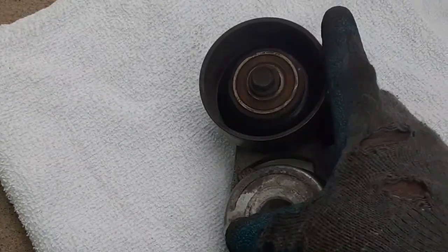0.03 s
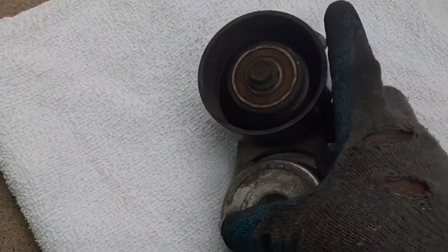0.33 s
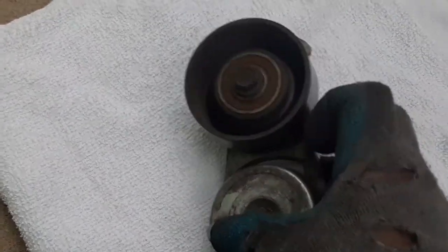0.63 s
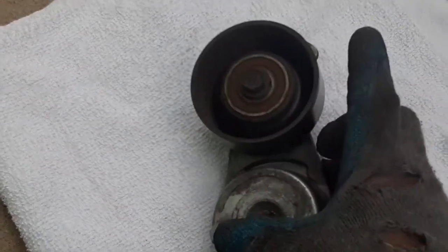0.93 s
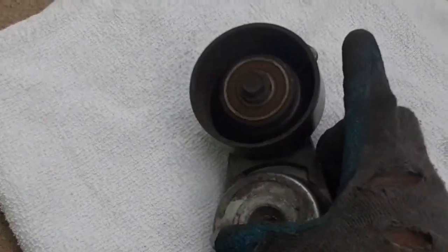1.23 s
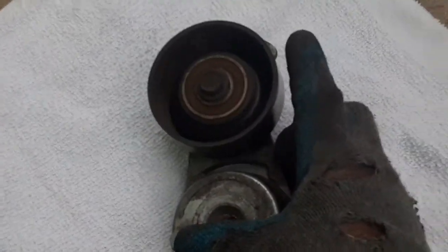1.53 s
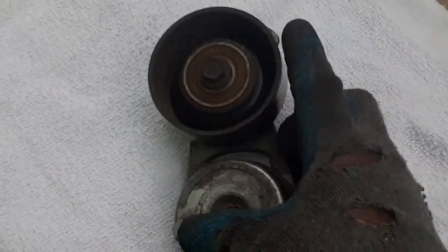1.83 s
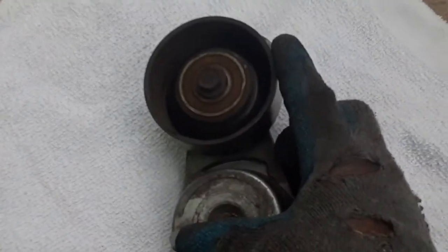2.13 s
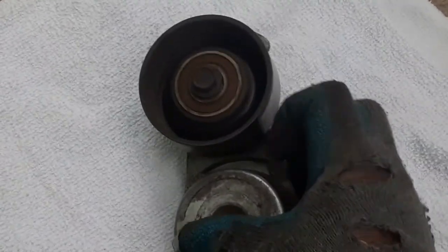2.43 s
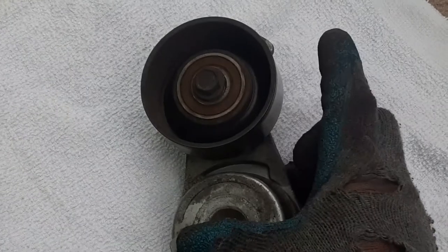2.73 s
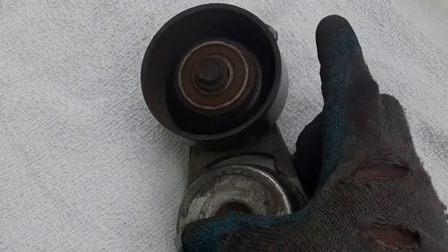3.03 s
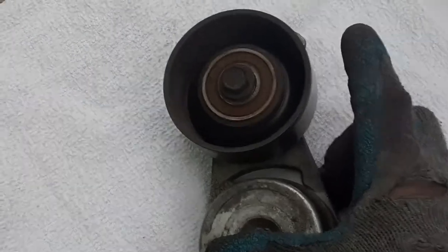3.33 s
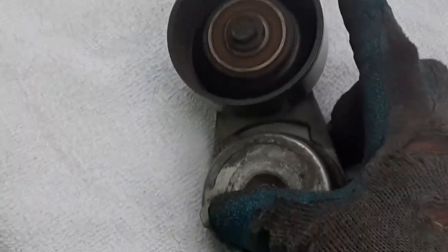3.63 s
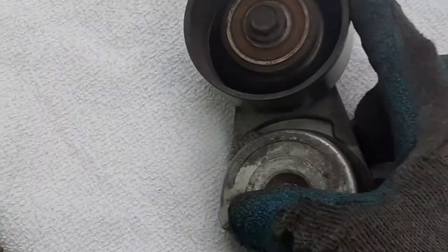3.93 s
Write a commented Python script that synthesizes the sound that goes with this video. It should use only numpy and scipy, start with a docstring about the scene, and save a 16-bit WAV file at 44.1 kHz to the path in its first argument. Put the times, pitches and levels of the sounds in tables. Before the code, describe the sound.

A steel pulley whirs quietly, close up indoors. A gloved finger clacks and scrapes against the rim, the bearing spins and fades, then a second flick sets it rattling lightly until the glove stops it, over a low rumble.

```python
"""Indoors, close up: a gloved finger flicks the steel pulley of a belt tensioner twice.
Stick-slip friction of the glove scrapes the rim, which rings in its free modes on release.
Impacts of the bearing balls force the wheel's resonances: a whir that fades as the wheel slows.
The held part clacks and bumps in the hand, over a low rumble and a faint far motor drone."""
import sys
import numpy as np
from scipy import signal
from scipy.fft import rfft, irfft
from scipy.io import wavfile
from scipy.ndimage import uniform_filter1d

SR = 44100
rng = np.random.default_rng(int(sys.argv[2]) if len(sys.argv) > 2 else 0)


def dump(signal):
    """Clip the signal to [-1, 1] and save it as 16-bit WAV at the path in sys.argv[1]."""
    limited = np.clip(np.atleast_2d(signal).T, -1, 1)
    pcm = np.round(limited * 32767).astype(np.int16)
    wavfile.write(sys.argv[1], SR, pcm)


N = 176400
T = np.arange(N) / SR
HZ = np.fft.rfftfreq(4096, 1 / SR)


def amp(db):
    """Amplitude ratio of a level in decibels."""
    return 10 ** (np.asarray(db) / 20)


def unit(x):
    """Normalisation to rms 1."""
    return x / np.sqrt(np.mean(x ** 2) + 1e-20)


def unit_power(shape_db):
    """Normalisation of a spectrum to a mean power gain of 1."""
    return shape_db - 10 * np.log10(np.mean(amp(shape_db) ** 2))


def read(points, hz):
    """Interpolation on a logarithmic frequency axis."""
    f, value = np.transpose(points)
    return np.interp(np.log(hz + 1), np.log(f + 1), value)


def resonance_db(hz, width):
    """Resonance curve over HZ, 0 dB at its peak."""
    return -13 * np.log10(1 + (2 * (HZ - hz) / width) ** 2)


def colour(x, gain_db):
    """Minimum-phase filtering with a gain given over HZ."""
    cepstrum = irfft(np.log(amp(gain_db)), axis=-1)
    half = len(HZ) - 1
    cepstrum[..., 1:half] *= 2
    cepstrum[..., half + 1:] = 0
    response = irfft(np.exp(rfft(cepstrum, axis=-1)), axis=-1)
    return signal.oaconvolve(x, np.atleast_2d(response), axes=1)[:, :N]


def drift(rate_hz):
    """Random modulation: low-pass noise of rms 1."""
    f = np.fft.rfftfreq(N, 1 / SR)
    return unit(irfft(rfft(rng.standard_normal(N)) * np.exp(-(f / rate_hz) ** 2), N))


def swell(peak, rise, fall):
    """Asymmetric bell envelope; times in seconds."""
    return np.exp(-.5 * abs((T - peak) / np.where(T < peak, rise, fall)) ** 1.67)


def shifted(x, shift_hz):
    """Single-sideband modulation: all frequencies move by the same varying amount."""
    return (signal.hilbert(x) * np.exp(2j * np.pi * np.cumsum(shift_hz) / SR)).real


def impacts(grain_db, per_s, coherence=0.32):
    """Shot noise: tiny impacts of uneven size, partly coherent between the channels."""
    size = amp(grain_db * np.minimum(rng.exponential(1, N), 5))
    struck = rng.random(N) < per_s / SR
    left, other = np.sign(rng.standard_normal((2, N)))
    shared = rng.random(N) < coherence
    return unit(size * struck * np.array([left, np.where(shared, left, other)]))


# Left-right coherence of the room's noise: frequency_hz, coherence_ratio
FIELD_COHERENCE = [(60, 1), (150, .98), (300, 0.81), (550, 0.74), (1000, 0.027), (12000, 0.036)]

def diffuse_noise(spectrum, top_hz):
    """A diffuse field is coherent between two points only at long wavelengths."""
    f = np.fft.rfftfreq(N, 1 / SR)
    left, other = rfft(rng.standard_normal((2, N)), axis=1)
    coherence = np.clip(read(FIELD_COHERENCE, f), 0, 1)
    right = coherence * left + np.sqrt(1 - coherence ** 2) * other
    gain = amp(read(spectrum, f)) / np.hypot(1, (f / top_hz) ** 10)
    return unit(irfft(np.array([left, right]) * gain, N, axis=1))


# Spectrum of the rumble: frequency_hz, relative_db
RUMBLE_SPECTRUM = [(15, -55), (40, -29), (60, -17), (80, 0.5), (100, 1.5), (135, 0.5), (168, -1.5),
                   (200, -11), (230, -13), (260, -29.5)]
# Envelope of the rumble: time_s, relative_db
RUMBLE_ENVELOPE = [(0, -36.5), (.45, -35), (.58, -38), (.69, -32), (.8, -38), (1.15, -32.5), (1.25, -34.5),
                   (1.5, -34), (1.66, -31), (1.85, -34), (2.1, -34), (2.3, -36.5), (2.7, -38), (3.3, -40),
                   (4, -43.5)]
# Spectrum of the steadier, deeper band: frequency_hz, relative_db
DEEP_SPECTRUM = [(15, -55), (28, -37), (40, -21.5), (54, 1.5), (75, -6.5), (110, -15), (200, -30)]

def rumble():
    """Amplitude modulation: two low noise bands swell together, a little louder on the left than on the right."""
    level_db = np.interp(T, *np.transpose(RUMBLE_ENVELOPE))
    deep_db = -49 + 0.64 * (level_db - level_db.mean())
    deep = amp(deep_db) * diffuse_noise(DEEP_SPECTRUM, top_hz=201)
    upper = amp(level_db) * diffuse_noise(RUMBLE_SPECTRUM, top_hz=248)
    return (upper + deep) * amp([[.9], [-.9]])


# Tones of a far motor: peak_s, spread_s, pitch_hz, glide_hz_per_s, level_db
MOTOR_TONES = [(2.3, .17, 301, 25, -52), (2.9, .16, 326, 35, -47.5), (3.55, .45, 431, 5, -55),
               (2.6, 1.5, 397, 1, -60.5)]

def far_motor(waver_hz=1.0):
    """Frequency modulation: faint tones waver and glide upward as they swell and fade."""
    out = np.zeros(N)
    for peak, spread, hz, glide, db in MOTOR_TONES:
        pitch = hz + glide * (T - peak) + waver_hz * drift(rate_hz=5.8)
        envelope = amp(db) * np.exp(-.5 * ((T - peak) / spread) ** 2)
        out += envelope * np.sin(2 * np.pi * np.cumsum(pitch) / SR)
    return out


# Spectrum of room air and hiss: frequency_hz, relative_db
AIR_SPECTRUM = [(120, -7), (230, -2), (320, -1.5), (500, -11), (750, -15), (1100, -17), (1600, -24),
                (2600, -36.5), (4200, -38), (7000, -46), (9500, -51), (11500, -35.5), (15700, -33.5)]

def room_air():
    """Stationary broadband noise sets the noise floor."""
    return amp(-49) * diffuse_noise(AIR_SPECTRUM, top_hz=SR)


def reverberation(x, level_db=-17, t60_s=.2):
    """Diffuse reflections build up quickly and decay exponentially."""
    t = T[:SR // 2]
    tail = rng.standard_normal((2, len(t))) * amp(-60 * t / t60_s) * np.minimum(t / 0.0092, 1)
    return amp(level_db) * signal.oaconvolve(x, tail / np.linalg.norm(tail[0]), axes=1)[:, :N]


# Balance of the wheel, which sits to the left: frequency_hz, left_minus_right_db
WHEEL_BALANCE = [(600, -0.5), (1400, 13), (2500, 8.5), (4400, 7.5), (6500, 5.5), (8100, 0.5), (9800, -5),
                 (15000, -13)]

def placed(x):
    """A level difference between the channels, at constant total power, locates the wheel."""
    lean_db = read(WHEEL_BALANCE, HZ)
    excess_db = 10 * np.log10(np.cosh(lean_db * np.log(10) / 20))
    return colour(x, np.array([lean_db, -lean_db]) / 2 - excess_db)


# Dead knocks of handling: start_s, level_db, pitch_hz, rise_s, left_minus_right_db
KNOCKS = [(0.874, -44, 910, 0.00083, 7.5), (1.3606, -37, 530, 0.0018, 1), (2.3457, -31, 1880, 0.00062, 14)]
# Reflections from bench and hand: delay_s, gain_db
REFLECTIONS = [(.0018, -16), (.003, -16), (.0042, -19)]

def knocks(direct_delay_s=0.0006, sharpness=3.6):
    """Heavy damping ends each knock in a cycle or two; early reflections follow."""
    out = np.zeros((2, N))
    for start, db, hz, rise, lean_db in KNOCKS:
        sides_db = db + np.array([[lean_db], [-lean_db]]) / 2
        for delay, gain_db in [(direct_delay_s, 0)] + REFLECTIONS:
            t = np.maximum(T - start - delay, 0)
            envelope = (t / rise * np.exp(1 - t / rise)) ** sharpness
            out += amp(sides_db + gain_db) * envelope * np.sin(2 * np.pi * hz * t)
    return out


def ring(modes, start, rise_s, right_lag_rad=1.3):
    """Free vibration: a sum of damped modes, lagging in phase on the right."""
    t = T[:SR]
    lag = np.array([[0], [right_lag_rad]])
    wave = sum(amp(db - 60 * t / t60) * np.sin(2 * np.pi * hz * t - lag) for hz, db, t60 in modes)
    attack = 1 - np.exp(-t / rise_s)
    return np.pad(wave * attack, ((0, 0), (round(start * SR), N)))[:, :N]


# Modes of the held part: pitch_hz, relative_db, t60_s
BODY_MODES = [(1020, -14, 0.014), (1320, 2, 0.015), (1590, -9.5, 0.044), (2260, -9, 0.034),
              (2480, -18, 0.048), (2860, -23, 0.019), (4500, -31, 0.016), (6340, -20.5, 0.01)]
# Impacts as the finger takes hold: start_s, level_db
BODY_IMPACTS = [(0.433, -46), (.447, -37.5), (0.4729, -33), (0.4789, -39), (0.4805, -30), (0.484, -28)]

def clacks():
    """Impulse response: each impact excites the short-lived modes of the held part."""
    return sum(amp(db) * ring(BODY_MODES, start, rise_s=0.00032) for start, db in BODY_IMPACTS)


# Slow rubs on the rim: peak_s, rise_s, fall_s, level_db
SLOW_RUBS = [(0, .03, 0.059, -61), (.222, 0.063, 0.067, -54.5), (.39, 0.087, 0.046, -77),
             (1.66, 0.012, 0.057, -64.5), (1.80, 0.017, 0.027, -67), (1.888, 0.017, 0.026, -61),
             (3.81, 0.026, 0.04, -78)]
# Spectrum of slow rubbing: frequency_hz, relative_db
RUB_SPECTRUM = [(200, 1), (700, -3.5), (1400, 3), (1900, -2), (2200, 1.5), (3300, -4), (4300, -5.5),
                (4900, -8.5), (5500, -8), (7000, -12.5), (10000, -14.5), (15700, -13.5)]
# Quick strokes on the rim: peak_s, rise_s, fall_s, level_db, treble_tilt_db_per_octave
QUICK_STROKES = [(0.481, 0.011, 0.02, -48.5, -2), (.525, 0.029, 0.016, -51.5, -4.5),
                 (.585, 0.022, 0.04, -49, -2.5), (0.696, 0.02, 0.017, -43.5, 0.8),
                 (.77, 0.023, 0.072, -62, 0), (2.385, 0.029, 0.031, -57, -6.5),
                 (2.422, 0.013, 0.0081, -47.5, 0.5), (2.518, 0.011, 0.034, -58.5, 3),
                 (3.775, 0.022, 0.028, -55, 2.6), (3.83, .03, 0.069, -62.5, 0)]
# Spectrum of a quick stroke on steel: frequency_hz, relative_db
STROKE_SPECTRUM = [(200, -23), (600, -1.5), (1400, 1.5), (1900, 0.5), (2500, 3), (3500, 0.5), (4600, -1),
                   (5800, -3), (7200, -4), (9500, -4.5), (12000, -1), (15700, -2)]

def glove():
    """Stick-slip friction: fibres catch on the rim, dull in slow rubs, brighter in quick strokes."""
    fibres = impacts(grain_db=3.1, per_s=12000) * amp(0.59 * drift(rate_hz=39))
    rubbing = sum(amp(db) * swell(peak, rise, fall) for peak, rise, fall, db in SLOW_RUBS)
    out = colour(fibres * rubbing, unit_power(read(RUB_SPECTRUM, HZ)))
    treble_octaves = np.log2(np.maximum(HZ, 2000) / 2000)
    for peak, rise, fall, db, tilt in QUICK_STROKES:
        shape_db = read(STROKE_SPECTRUM, HZ) + tilt * treble_octaves
        out += colour(fibres * swell(peak, rise, fall), db + unit_power(shape_db))
    return out


# Scuffs and squeaks on the wheel: peak_s, spread_s, level_db, centre_hz, width_hz
SCUFF_BURSTS = [(.22, 0.017, -53, 2650, 450), (.225, 0.027, -62, 4060, 700),
                (0.455, 0.0055, -51.5, 2470, 300), (.53, 0.011, -57.5, 2700, 600),
                (.594, 0.0082, -51, 2350, 400), (.693, 0.009, -55, 1580, 500),
                (1.335, .004, -60, 13000, 3970), (1.376, 0.0087, -61, 6500, 1200),
                (2.685, 0.0027, -62, 13000, 3500), (2.70, .006, -66, 3920, 900),
                (3.05, .012, -68, 14300, 1500), (3.11, .006, -66, 14000, 2500),
                (3.582, .003, -63, 14500, 1500)]

def scuffs():
    """Frictional excitation: each short burst of slips drives one resonance."""
    slips = impacts(grain_db=2.5, per_s=17000)
    out = np.zeros((2, N))
    for peak, spread, db, hz, width in SCUFF_BURSTS:
        shape_db = -20 * np.log10(1 + 2 * ((HZ - hz) / width) ** 2)
        out += colour(slips * swell(peak, spread, spread), db + unit_power(shape_db))
    return out


# Judder of the braking glove: peak_s, rise_s, fall_s, level_db
JUDDER = (3.806, .038, .014, -57.5)
# Rim resonances under the judder: centre_hz, width_hz, relative_db
JUDDER_MODES = [(1620, 220, -2), (2060, 420, 0), (2560, 160, -5)]

def brake():
    """Coarse stick-slip excites the rim as the glove stops the wheel."""
    peak, rise, fall, db = JUDDER
    power = sum(amp(mode_db + resonance_db(hz, width)) ** 2 for hz, width, mode_db in JUDDER_MODES)
    slips = impacts(grain_db=3.0, per_s=900) * swell(peak, rise, fall)
    return colour(slips, db + unit_power(10 * np.log10(power)))


# Modes of the steel rim: pitch_hz, relative_db, t60_s
RIM_MODES = [(2520, -1, .4), (3044, -6, .6), (3488, -6, .4), (5816, -5, .3), (9493, -.5, .6),
             (11200, 2, .1), (14228, 2, .48)]
# The finger leaves the rim: start_s, level_db
RIM_RELEASES = [(0.695, -57.5), (2.425, -78)]

def rim(beat_hz=19, beat_db=3, rough_db=2.2, waver_hz=12):
    """Free vibration of the released rim, beating and roughened by the balls."""
    ringing = sum(amp(db) * ring(RIM_MODES, start, rise_s=0.008) for start, db in RIM_RELEASES)
    throb_db = beat_db * np.cos(2 * np.pi * beat_hz * T) + rough_db * drift(rate_hz=200)
    return shifted(ringing * unit(amp(throb_db)), waver_hz * drift(rate_hz=49))


# Free spins: start_s, stop_s, level_db, decay_db_per_s, initial_turns_per_s, run_out_s
FREE_SPINS = [(0.717, 1.56, -57.5, 8, 15, 0.16), (2.411, 3.746, -55, 5.5, 14, 0.073)]
# Moments of harder rattling: peak_s, spread_s, added_db
RATTLE_SURGES = [(1.11, .015, 2), (2.45, .015, 2), (2.52, .018, 2.5), (2.68, .025, 3), (2.80, .014, 4),
                 (2.89, .01, 2.5), (3.12, .014, 4.5), (3.39, .012, 2.5)]

def rolling(spin_up_s=0.0072, wobble=.12, flutter_db=1.5):
    """Rolling contact: balls rattle in the race, modulated by each turn and fading with speed."""
    level = np.zeros(N)
    for start, stop, db, decay, turns, run_out in FREE_SPINS:
        age = np.maximum(T - start, 0)
        fade = amp(-decay * age) * np.exp(-np.maximum(T - stop, 0) / run_out)
        angle = 2 * np.pi * np.cumsum(turns * np.sqrt(fade)) / SR
        swing = 1 + wobble * (np.cos(angle) + np.cos(2 * angle))
        level += amp(db) * np.minimum(age / spin_up_s, 1) * fade * swing
    surge_db = sum(db * swell(peak, spread, spread) for peak, spread, db in RATTLE_SURGES)
    rattle = impacts(grain_db=2.3, per_s=5000)
    return rattle * level * amp(surge_db + flutter_db * drift(rate_hz=120))


# The bearing's main ring, higher late in each spin: time_s, pitch_hz, above_rolling_db
HOWL_PATH = [(.75, 2490, -5), (1.15, 2500, -5), (1.36, 2520, -3.5), (1.53, 2750, -4), (1.65, 2660, -3),
             (1.8, 2580, 4.5), (2.45, 2480, -9), (2.7, 2560, -12), (3.15, 2560, -9), (3.55, 2640, -6.5),
             (3.75, 2620, -5)]

def howl(balls, jitter_hz=85, follow_s=.008):
    """Sustained vibration: one tone follows the rms of the rolling, its pitch jostled by the balls."""
    when, hz, db = np.transpose(HOWL_PATH)
    drive = np.sqrt(abs(uniform_filter1d(balls ** 2, round(follow_s * SR), axis=1)))
    pitch = np.interp(T, when, hz) + jitter_hz * np.array([drift(rate_hz=300), drift(rate_hz=300)])
    tone = unit(np.sin(2 * np.pi * np.cumsum(pitch, axis=1) / SR))
    return drive * amp(np.interp(T, when, db)) * tone


# Sharp wheel modes: centre_hz, width_hz, relative_db, left_minus_right_db
SHARP_MODES = [(1018, 40, -12.5, 3), (2440, 70, -14.5, 10), (3044, 22, -18, 6), (3485, 60, -19, 10),
               (5816, 30, -28, 9), (6830, 90, -28, 3), (7588, 55, -20.5, 1), (8075, 70, -23, 11),
               (8540, 130, -26.5, -1), (14400, 500, -17, -3)]

def whine(balls, gain_db=2.5, shimmer_db=1.3, waver_hz=5):
    """Lightly damped resonances select narrow, wavering bands from the rolling."""
    out = np.zeros((2, N))
    for hz, width, db, lean_db in SHARP_MODES:
        sides = unit(amp(np.array([[lean_db], [-lean_db]]) / 2))
        band = colour(balls, gain_db + db + unit_power(resonance_db(hz, width)))
        shimmer = unit(amp(shimmer_db * drift(rate_hz=28)))
        out += sides * band * shimmer
    return shifted(out, waver_hz * drift(rate_hz=29.7))


# Spectrum of the bearing's hiss: frequency_hz, relative_db
BEARING_SPECTRUM = [(200, -13.5), (600, 6), (1100, -0.5), (1500, 6), (2000, -0.5), (3200, -2.5),
                    (4300, -8.5), (5600, -2.5), (6900, -9.5), (10000, -12.5), (13000, -17.5),
                    (15700, -16.5)]
# Broad wheel resonances: centre_hz, width_hz, relative_db
BROAD_MODES = [(1104, 110, 6), (2490, 460, 3.5), (2690, 200, -3), (3450, 500, 3), (5340, 350, -4),
               (6180, 71, -1), (13800, 490, -8.5)]

def bearing():
    """Forced vibration: the same rolling drives a broad whir, the howl and the whine."""
    balls = rolling()
    power = amp(read(BEARING_SPECTRUM, HZ)) ** 2
    power += sum(amp(db + resonance_db(hz, width)) ** 2 for hz, width, db in BROAD_MODES)
    whir = colour(balls, unit_power(10 * np.log10(power)))
    return placed(whir + howl(balls)) + whine(balls)


def scene():
    """Superposition of pulley and hand, their reverberation and the background."""
    near = bearing() + placed(glove() + scuffs() + brake() + rim() + clacks()) + knocks()
    return near + reverberation(near) + rumble() + far_motor() + room_air()


def record(dry):
    """Band limiting: a linear-phase low-pass removes the highest treble."""
    low_pass = signal.firwin(1023, cutoff=15730, window=("kaiser", 9), fs=SR)
    return signal.oaconvolve(dry, low_pass[None], "same")


dry = scene()
out = record(dry)
dump(out)
```